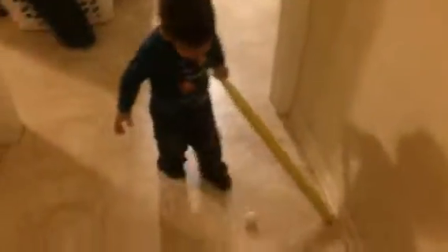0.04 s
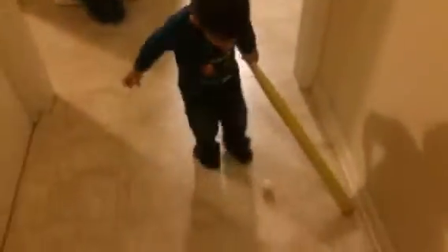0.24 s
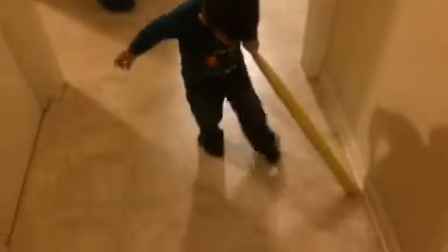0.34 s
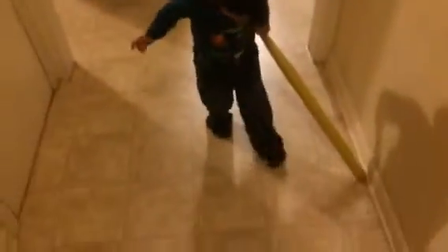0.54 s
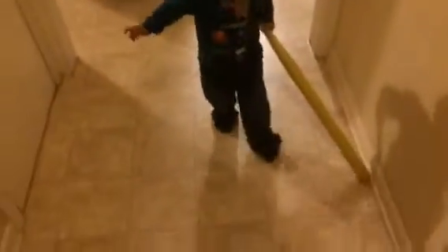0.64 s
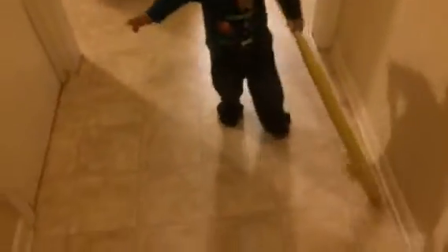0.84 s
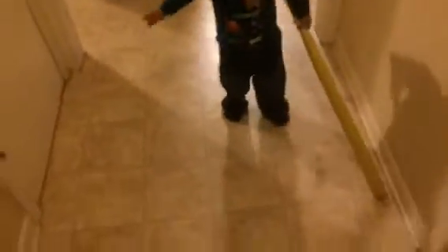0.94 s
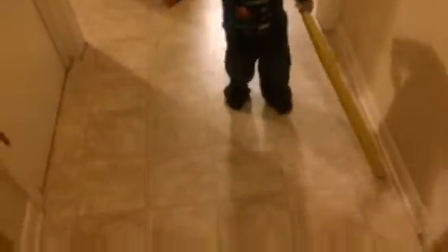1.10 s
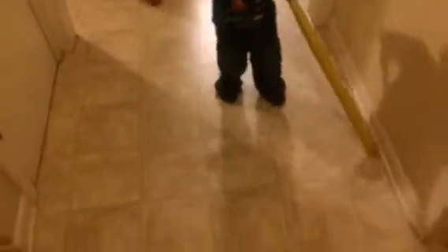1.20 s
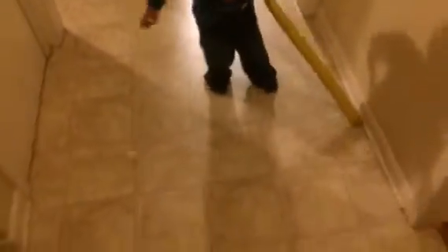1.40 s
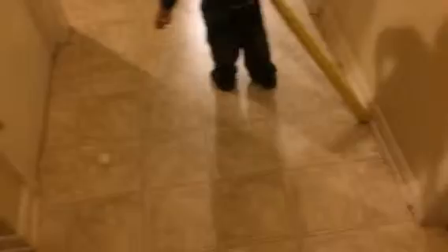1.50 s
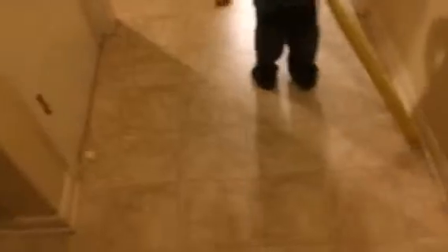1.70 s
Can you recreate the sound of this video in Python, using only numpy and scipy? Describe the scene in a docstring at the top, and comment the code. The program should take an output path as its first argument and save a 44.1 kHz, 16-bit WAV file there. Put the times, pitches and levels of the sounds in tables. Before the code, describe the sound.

A hollow plastic club knocks on a hard floor while a small ball bounces.

```python
"""Toy club and ball in a hallway

A toddler knocks a hollow plastic club on a hard floor and scuffs it once; the tube rings and clacks.
A small hollow ball drops, bounces unevenly, quicker and fainter toward the end, and rolls softly.
Soft steps thump and shuffle. The floor booms under the blows and the close walls answer,
over room air and a faint low hum."""
import sys
import numpy as np
from scipy import signal
from scipy.fft import rfft, irfft
from scipy.io import wavfile
from scipy.ndimage import uniform_filter1d

SR = 44100
rng = np.random.default_rng(int(sys.argv[2]) if len(sys.argv) > 2 else 0)


def master(y):
    """Save y as 16-bit WAV."""
    cut = np.clip(np.atleast_2d(y).T, -1, 1)
    pcm = np.round(cut * 32767)  # scale
    wavfile.write(sys.argv[1], SR, pcm.astype(np.int16))


N = 77175
T = np.arange(N) / SR

# Club knocks. Each row: start in seconds, pitch ratio, then tube, clack, snap, tick, boom levels in dB.
CLUB_KNOCKS = [(0.2206, 1.0, -30, -42, -54, -62, -40.5), (0.6176, 0.95, -33.5, -47.5, -63.5, -77, -58.5),
               (0.7802, 0.9, -41.5, -55.5, -76, -56, -61), (0.8092, 0.9, -46.5, -63, -88, -82, -66),
               (0.845, 0.807, -53.5, -50, -70, -89, -53.5), (0.9439, 0.99, -32, -34, -45, -51, -39),
               (0.959, 1.03, -44, -48, -66, -55, -52), (0.9696, 1.206, -35, -39.5, -63, -53, -75),
               (1.0254, 0.9, -39.5, -49, -66, -79, -39.5), (1.3501, 0.98, -38.5, -42, -59, -70.5, -59),
               (1.39, 0.94, -47, -56, -89, -85, -48), (1.438, 0.93, -45.5, -58, -72, -96, -69)]
# Club scuff. Each row: peak time, rise, fall in seconds, then tube, rattle, hiss levels in dB.
SCUFF_SWELLS = [(0.786, 0.013, 0.0019, -45, -48, -48), (0.815, 0.0096, 0.04, -45, -55, -94)]
# Ball bounces. Each row: start in seconds, clack level in dB, clack pitch ratio,
# then shell, tick, boom levels in dB.
BALL_BOUNCES = [(0.5617, -66.5, 0.82, -94, -83, -77), (0.7869, -55, 1.09, -60, -56.5, -57.5),
                (0.8746, -46.5, 0.72, -79, -63.5, -70), (1.1328, -35, 1.05, -59.5, -56, -48),
                (1.231, -45, 0.82, -71.5, -63, -43.5), (1.301, -51, 0.79, -72.5, -69.5, -44.5),
                (1.3949, -60, 1.23, -85, -71, -82), (1.462, -46, 1.07, -69, -69, -58.5),
                (1.505, -57, 0.94, -81, -77, -82), (1.5407, -54.5, 0.93, -73.5, -87, -66),
                (1.5813, -50.5, 0.88, -80, -69.5, -81), (1.6276, -52.5, 1.02, -75, -77, -58.5),
                (1.6706, -60, 0.83, -83, -84, -64), (1.7113, -55, 0.88, -83, -74.5, -54.5)]
# Footfalls. Each row: start in seconds, heel level in dB, sole level in dB.
FOOTFALLS = [(0.109, -79, -55.5), (0.482, -87, -59.5), (0.521, -59, -70), (0.556, -59, -72),
             (0.59, -54, -55), (0.945, -51.5, -46), (1.231, -55.5, -58), (1.696, -55, -57)]
# Feet and clothes shuffle; the last swell is the ball rolling softly on the floor.
# Each row: peak time, rise, fall in seconds, then rub, swish, slide levels in dB.
SHUFFLE_AND_ROLL_SWELLS = [(0.16, 0.048, 0.12, -50.5, -61, -91), (0.434, 0.022, 0.04, -58, -94, -94),
                           (0.555, 0.031, 0.13, -61, -70, -70), (0.591, 0.0042, 0.0048, -48, -59, -80),
                           (1.422, 0.18, 0.11, -54, -58.5, -78), (1.68, 0.064, 0.26, -79, -64, -80)]
# Near-wall echoes. Each row: delay in seconds, gain in dB.
WALL_ECHOES = [(0.0066, -19.5), (0.012, -18.5), (0.016, -13.5), (0.023, -33.5)]

# Modes of struck bodies and the hallway. Each row: frequency in Hz, relative level in dB, T60 in seconds.
TUBE_MODES = [(237, -11.5, 0.08), (330, -8.5, 0.077), (505.7, 4.5, 0.029), (650.8, -19, 0.2),
              (965.5, -7.5, 0.048), (1107, -22.5, 0.076), (1856, -11, 0.024), (2164, -18.5, 0.026)]
CLUB_CLACK_MODES = [(659, 0, 0.031), (843, 6, 0.0091), (1241, 10.5, 0.0076), (1642, -6.5, 0.037),
                    (2005, -17, 0.023), (2470, -17.5, 0.048), (2784, -13.5, 0.03)]
TIP_MODES = [(2980, 8.5, 0.0078), (3865, -3, 0.011), (4190, 6, 0.005)]
BALL_CLACK_MODES = [(383, -12, 0.043), (502, -3, 0.032), (974, -1.5, 0.026), (1284, 1.5, 0.013),
                    (1608, 1, 0.019), (1978, -2.5, 0.0087), (3420, -18.5, 0.013)]
SHELL_MODES = [(6570, -4.5, 0.026), (6930, 4, 0.027), (8530, -5, 0.028), (10550, -2, 0.018),
               (12250, -5, 0.013)]
FLOOR_MODES = [(148.34, 2, 0.25), (186, -2, 0.21), (204, -16, 0.24)]
HEEL_MODES = [(62.6, 33, 0.033), (83, -28, 0.06)]
SOLE_MODES = [(178, 13.5, 0.24), (294, 21.5, 0.06), (431, 20, 0.026), (960, 4.5, 0.06), (1480, -14, 0.035)]
STANDING_WAVES = [(151.4, -3, 1), (280, -24, 0.56), (492, 1, 0.082), (505.6, 6, 0.079)]

# Noise spectra of contact, friction and room. Each row: frequency in Hz, relative level in dB.
CLUB_TICK_SPECTRUM = [(1500, -12), (2800, -2), (4300, 2), (5900, 0), (7300, -2), (8400, 4.5), (9100, -2),
                      (10000, 5), (13000, -7), (15500, -13)]
SCUFF_SPECTRUM = [(500, 11.5), (1800, 15), (2600, -3), (6200, -3), (7500, 1.5), (10200, 2), (12500, -5),
                  (15500, -12)]
BALL_TICK_SPECTRUM = [(1500, -13), (2800, -3), (3600, 0.5), (4400, -5.5), (6000, -10.5), (8000, -0.5),
                      (10500, 2.5), (13000, -10), (15500, -11)]
RUB_SPECTRUM = [(60, -30), (115, -9), (150, 7.5), (200, -12), (255, -0.5), (310, 0), (370, -9), (480, -9),
                (700, -33), (2000, -55)]
SWISH_SPECTRUM = [(200, 9.5), (950, 8.5), (1900, 3), (2600, -11.5), (6000, -20.5), (8000, -25),
                  (10000, -20), (15000, -20)]
SLIDE_SPECTRUM = [(2000, 1), (3200, 1), (5800, 0.5), (7000, -9), (8100, 3.5), (9000, -7), (12000, -11),
                  (15000, -12)]
TAIL_SPECTRUM = [(50, -19), (110, -4), (150, -18), (190, 4.5), (320, 2), (500, -0.5), (1000, 2),
                 (1900, 2.5), (3000, 1.5), (4300, -1.5), (7000, 2.5), (14000, -7)]
AIR_SPECTRUM = [(25, -19), (55, 1.5), (100, 2.5), (150, 2), (220, 1.5), (290, 4.5), (480, 2), (800, -11),
                (1000, -12.5), (1900, -16), (2700, -21), (6000, -28), (11000, -34.5), (15000, -38)]


def club():
    """Each knock rings the hollow tube and the floor; hard ones also clack, snap the stiff tip and tick."""
    snap, boom, out = ring(TIP_MODES), ring(FLOOR_MODES), np.zeros(N)
    for start_s, pitch, tube_db, clack_db, snap_db, tick_db, boom_db in CLUB_KNOCKS:
        out += strike(start_s, tube_db, ring(TUBE_MODES, pitch))
        out += strike(start_s, clack_db, ring(CLUB_CLACK_MODES, pitch))
        out += strike(start_s, snap_db, snap)
        out += strike(start_s, tick_db, tick(CLUB_TICK_SPECTRUM))
        out += strike(start_s, boom_db, boom)
    return out


def ball():
    """Each bounce clacks at a pitch set by where it lands, rings the thin shell and nudges the floor."""
    shell, boom, out = ring(SHELL_MODES), ring(FLOOR_MODES), np.zeros(N)
    for start_s, clack_db, pitch, shell_db, tick_db, boom_db in BALL_BOUNCES:
        out += strike(start_s, clack_db, ring(BALL_CLACK_MODES, pitch))
        out += strike(start_s, shell_db, shell)
        out += strike(start_s, tick_db, tick(BALL_TICK_SPECTRUM))
        out += strike(start_s, boom_db, boom)
    return out


def scuff():
    """The club head slides: rough friction hisses, shakes the tube and rattles its wall."""
    out = np.zeros(N)
    for peak_s, rise_s, fall_s, tube_db, rattle_db, hiss_db in SCUFF_SWELLS:
        force = swell(peak_s, rise_s, fall_s) * grain(depth_db=-3, samples=60)
        body = amp(tube_db) * ring(TUBE_MODES) + amp(rattle_db) * ring(CLUB_CLACK_MODES)
        out += convolve(force * rng.standard_normal(N), body)
        out += amp(hiss_db) * force * noise(SCUFF_SPECTRUM)
    return out


def steps():
    """Heels thump and soles pat."""
    heel, sole, out = ring(HEEL_MODES), ring(SOLE_MODES), np.zeros(N)
    for start_s, heel_db, sole_db in FOOTFALLS:
        out += strike(start_s, heel_db, heel) + strike(start_s, sole_db, sole)
    return out


def shuffle_and_roll():
    """Feet and clothes shuffle; the last swell is the ball rolling softly on the floor."""
    rub = noise(RUB_SPECTRUM)
    swish = noise(SWISH_SPECTRUM) * grain(depth_db=4.5, samples=200)
    slide, out = noise(SLIDE_SPECTRUM), np.zeros(N)
    for peak_s, rise_s, fall_s, rub_db, swish_db, slide_db in SHUFFLE_AND_ROLL_SWELLS:
        friction = amp(rub_db) * rub + amp(swish_db) * swish + amp(slide_db) * slide
        out += swell(peak_s, rise_s, fall_s) * friction
    return out


def hallway(sound, tail_db, modes_db=-41, build_s=0.0027, low_hz=740, high_hz=2580):
    """Direct sound plus near-wall echoes, standing waves and a short diffuse tail."""
    wash = noise(TAIL_SPECTRUM)
    low = signal.sosfiltfilt(signal.butter(3, low_hz, "low", fs=SR, output="sos"), wash)
    high = signal.sosfiltfilt(signal.butter(3, high_hz, "high", fs=SR, output="sos"), wash)
    mid = wash - low - high
    tail = low * fade(t60_s=0.22) + mid * fade(t60_s=0.27) + high * fade(t60_s=0.23)
    tail *= 1 - np.exp(-T / build_s)
    response = amp(tail_db) * unit(tail) + amp(modes_db) * ring(STANDING_WAVES)
    response[0] += 1  # direct path
    for delay_s, db in WALL_ECHOES:
        response[int(delay_s * SR)] += amp(db)
    return convolve(sound, response)


def room_tone(air_db=-59.5, hum_db=-64.5, hum_hz=149.8):
    """Steady room air and a faint, wavering hum."""
    hum = amp(hum_db) * np.sqrt(2) * np.sin(2 * np.pi * hum_hz * T)
    waver = grain(depth_db=4, samples=5000)
    return hum * waver + amp(air_db) * noise(AIR_SPECTRUM)


def ring(modes, pitch=1, rise_cycles=0.3):
    """Decaying modes of alternating sign, unit energy; little radiates below the lowest."""
    swing = np.zeros(N)
    for k, (hz, db, t60_s) in enumerate(modes):
        envelope = amp(db) * fade(t60_s) * (1 - np.exp(-hz * T / rise_cycles))
        swing += (-1) ** k * envelope * np.sin(2 * np.pi * hz * pitch * T)
    cut_hz = 0.86 * modes[0][0]
    return unit(signal.sosfilt(signal.butter(2, cut_hz, "high", fs=SR, output="sos"), swing))


def tick(spectrum):
    """Brief bright crack of plastic meeting the floor."""
    return unit(noise(spectrum) * fade(t60_s=0.017))


def strike(start_s, db, response, blow_s=0.025):
    """Set off a unit-energy response; db is its level with the energy spread over blow_s."""
    delayed = np.concatenate([np.zeros(int(start_s * SR)), response])[:N]
    return amp(db) * np.sqrt(blow_s * SR) * delayed


def noise(spectrum):
    """Shaped noise, rms 1."""
    hz, db = np.array(spectrum).T
    gain = amp(np.interp(np.log(np.fft.rfftfreq(N, 1 / SR) + 1), np.log(hz), db))
    return unit(irfft(rfft(rng.standard_normal(N)) * gain, N)) * np.sqrt(N)


def grain(depth_db, samples):
    """Random gain, smoothed over a span of samples."""
    return amp(depth_db * np.sqrt(samples) * uniform_filter1d(rng.standard_normal(N), samples))


def swell(peak_s, rise_s, fall_s):
    """Exponential rise and fall; rise_s and fall_s are time constants."""
    return np.exp(np.minimum((T - peak_s) / rise_s, (peak_s - T) / fall_s))


def fade(t60_s):
    return np.exp(-np.log(1000) * T / t60_s)


def amp(db):
    return 10 ** (np.asarray(db) / 20)


def unit(x):
    """Scale to energy 1."""
    return x / np.sqrt(np.sum(x ** 2))


def convolve(x, response):
    return signal.fftconvolve(x, response)[:N]


def scene():
    """Knocks, bounces and softer sounds take their own paths through the hallway, over room tone."""
    knocks = hallway(club(), tail_db=-4.5)
    bounces = hallway(ball(), tail_db=-7)
    soft = hallway(scuff() + steps() + shuffle_and_roll(), tail_db=-1.5)
    return (knocks + bounces + soft + room_tone())[None]


def record(dry, top_hz=15300):
    """Steep low-pass on the top treble."""
    return signal.sosfilt(signal.ellip(10, .2, 70, top_hz, fs=SR, output="sos"), dry)


dry = scene()
out = record(dry)
master(out)
```